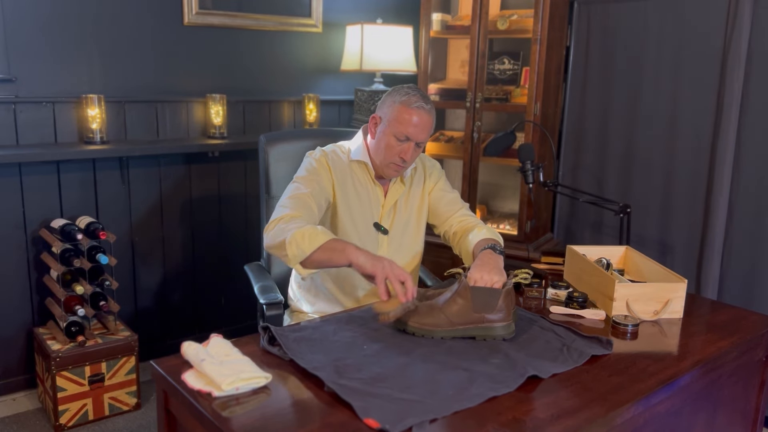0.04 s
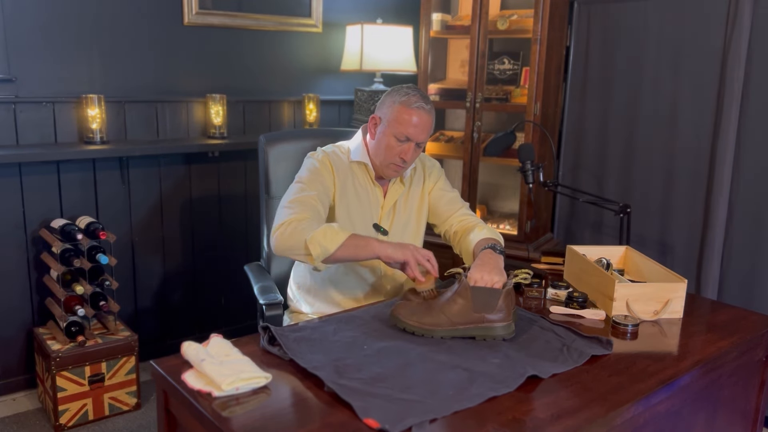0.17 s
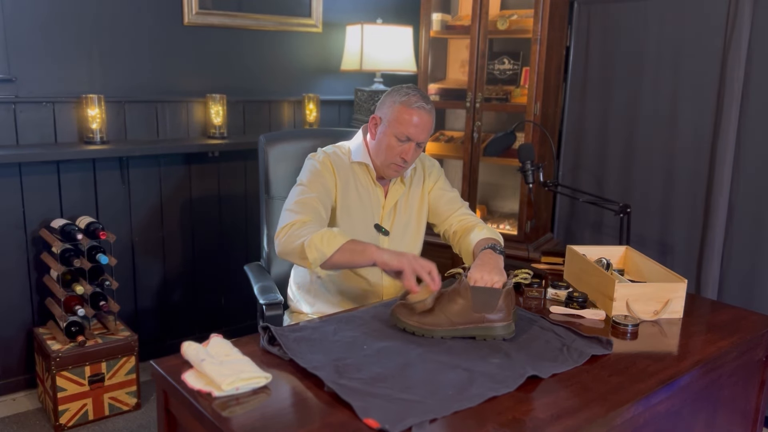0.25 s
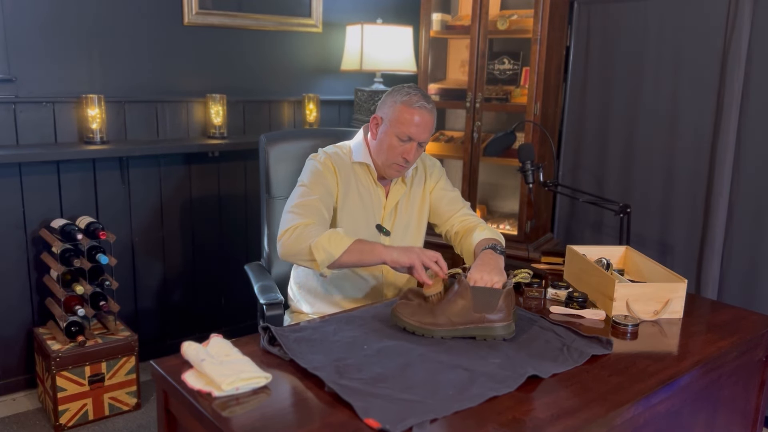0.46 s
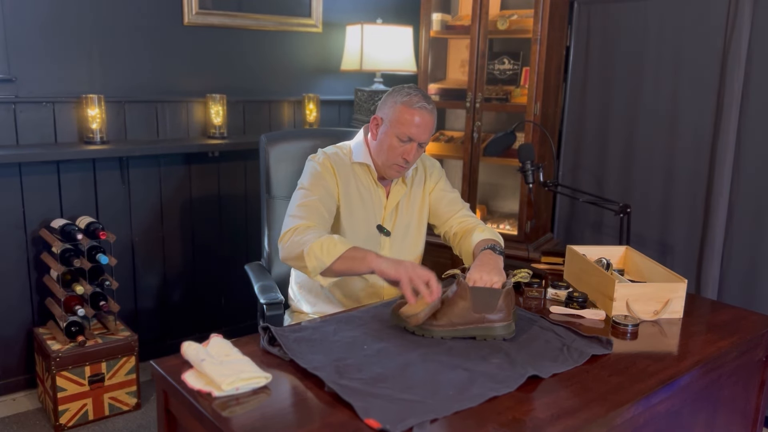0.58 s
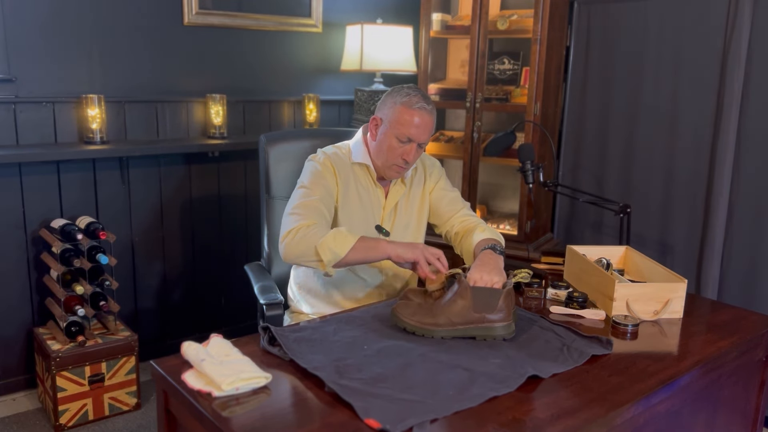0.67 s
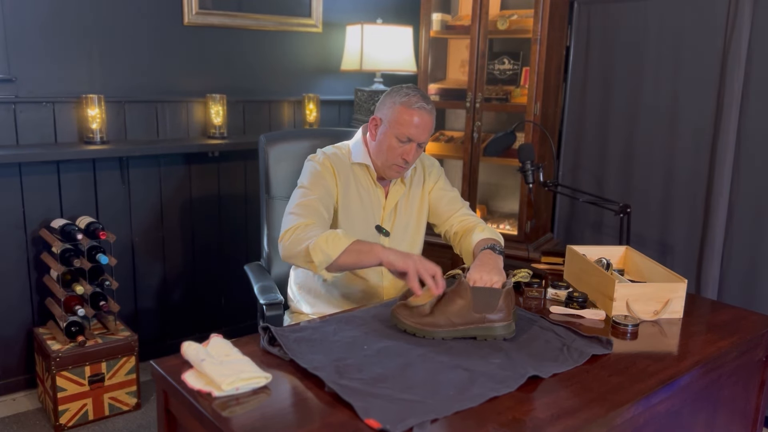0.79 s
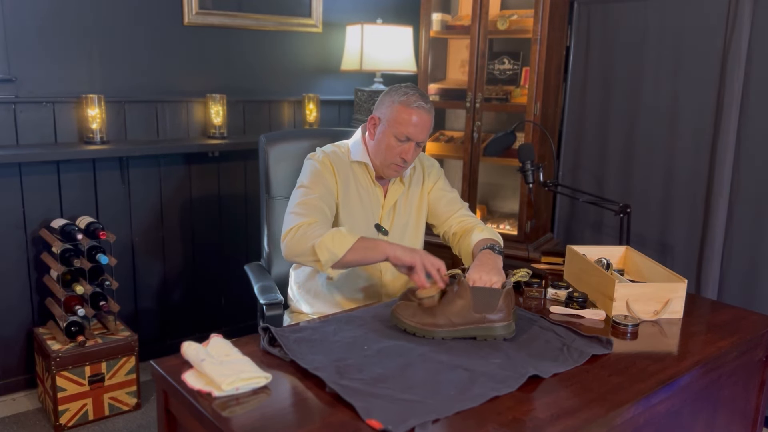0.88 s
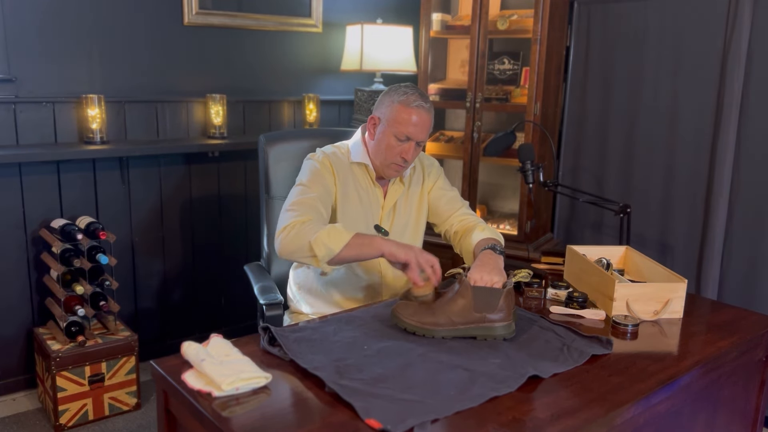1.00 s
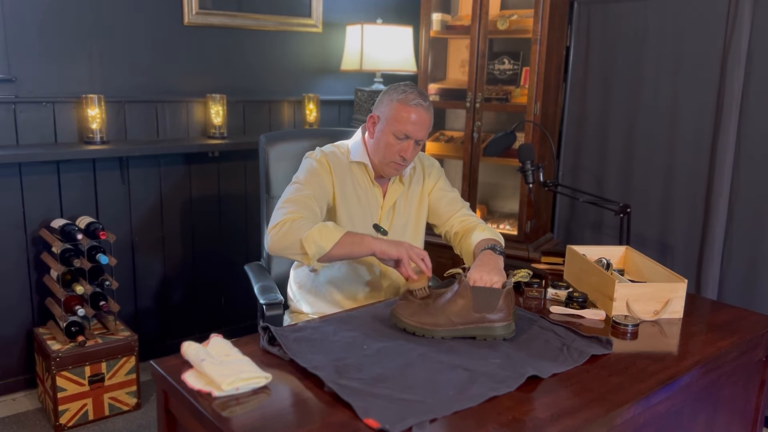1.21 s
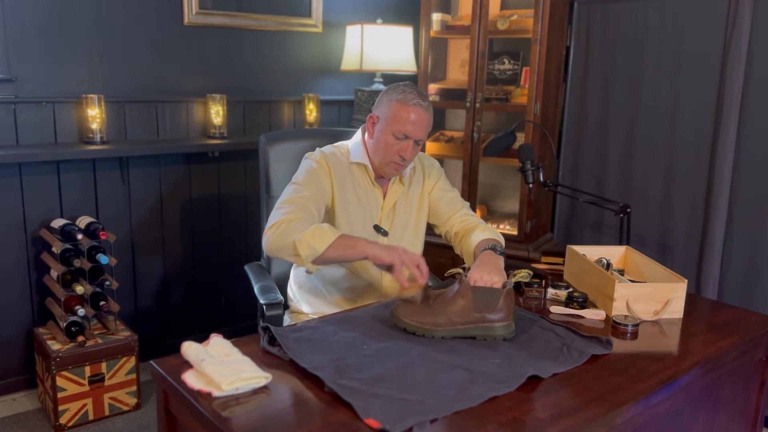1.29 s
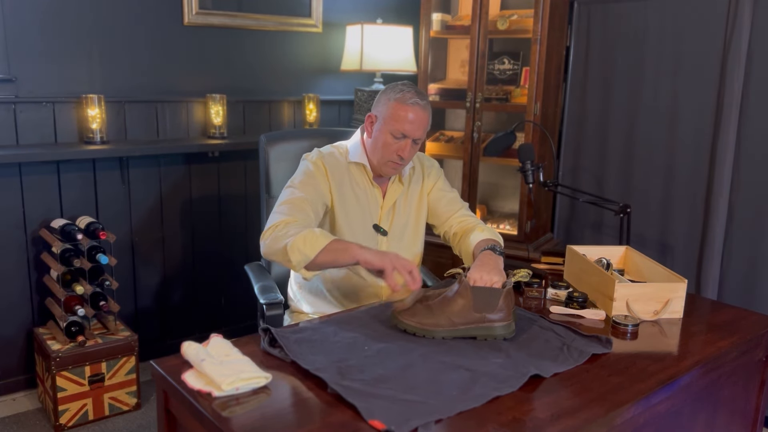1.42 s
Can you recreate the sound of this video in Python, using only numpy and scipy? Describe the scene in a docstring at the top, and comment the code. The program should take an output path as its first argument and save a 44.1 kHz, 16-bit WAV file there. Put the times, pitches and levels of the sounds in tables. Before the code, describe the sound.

Brisk, close brushing on a leather boot, bristles rasping over the hollow toe.

```python
"""A hand brush scrubs a leather boot, back and forth about eight times a second, close to the microphone.
At each turn the bristles bite and judder on the hollow boot; then they slide, hiss and flick free.
Tufts snag now and then, the boot bumps once on the covered table, and the arm's motion rumbles faintly.
Farther off, a quiet furnished room gives a short, soft answer."""
import sys
import numpy as np
from scipy import signal
from scipy.fft import rfft, irfft, next_fast_len
from scipy.io import wavfile
from scipy.ndimage import uniform_filter1d

SR = 44100
rng = np.random.default_rng(int(sys.argv[2]) if len(sys.argv) > 2 else 0)


def file_out(sig):
    """Save sig as 16-bit WAV at sys.argv[1]."""
    # one column per channel
    cols = np.atleast_2d(sig).T
    # limit, then scale
    lim = np.clip(cols, -1, 1)
    pcm = np.round(lim * 32767).astype(np.int16)
    wavfile.write(sys.argv[1], SR, pcm)


N = 63945
SLIPS_PER_S, SCRAPES_PER_S = 640, 1300
RELEASE_DB_PER_S = 531


# The scrubbing, close up. Each row: start, length and grip time in seconds, pitch of the spot struck
# in Hz, then levels in dB of thud, judder, scrape, brush ring, hiss, sizzle and flick.
SCRUBS = [ (0.093, 0.093, 0.047, 315, -65, -78, -79, -87, -93, -98, -79),
          (0.214, 0.093, 0.018, 327, -55.5, -62, -55, -65.5, -88, -71, -79),
          (0.248, 0.095, 0.0084, 432, -47, -48, -54.5, -63, -62, -74, -86),
          (0.369, 0.069, 0.013, 273, -44, -46.5, -47, -54.5, -57, -64, -75),
          (0.489, 0.074, 0.011, 400, -50, -47, -46, -60, -70, -62, -77),
          (0.606, 0.088, 0.025, 328, -42.5, -43, -47, -56, -58, -60, -60),
          (0.75, 0.17, 0.035, 399, -43, -48.5, -46, -60, -65.5, -58, -75),
          (0.862, .100, 0.028, 364, -52.5, -43, -46, -55.5, -55.5, -64, -53),
          (1.003, 0.098, 0.025, 285, -42, -49, -51.5, -57, -63, -64, -74),
          (1.142, 0.086, 0.028, 265, -50, -54, -66.5, -63.5, -69, -78, -62.5),
          (1.256, 0.15, 0.021, 409, -62.5, -69, -74, -82, -79.5, -75, -83.5),
          (1.4, 0.07, 0.061, 348, -65, -73, -80.5, -82.5, -86, -85, -103)]
# The hollow boot's resonances. Each row: centre in Hz, width in Hz, gain in dB.
BOOT_MODES = [(215, 40.6, -3), (287, 27.4, 1), (315.1, 22.5, 1), (373.4, 50.5, 1.5), (478, 41.7, -1.5),
              (496.8, 17.4, 3), (587.7, 77.4, 0.5), (847, 49, -5.5), (894, 33.7, -2), (986, 40, -1.5),
              (1011, 47, -2), (1191, 90, -1.5), (1309, 49, -3), (1490, 218, -9.5)]
# Colours of the biting and dragging forces. Each row: frequency in Hz, relative level in dB.
JUDDER_COLOUR = [(100, -15), (240, -26), (380, 7), (560, 4), (700, -9), (1000, -2), (1800, -12),
                 (4000, -50)]
DRAG_COLOUR = [(100, -50), (300, -3), (600, -4), (900, 1), (1400, -3.5), (1900, 5), (2400, -7.5), (4000, 8),
               (8000, -60)]
def boot():
    """The bite at each turn thuds and judders on the boot; the drag scrapes its higher resonances."""
    start, length, grip_s, _, _, judder_db, scrape_db = np.transpose(SCRUBS)[:7]
    bite = sum(gripping(*row) for row in zip(start, length, grip_s, judder_db))
    drag = stroking(scrape_db, rise_s=0.038, hold_s=0.0083, lead_s=0.012,
                    sag_db_per_s=125, release_db_per_s=426)
    thud = resonate(thuds(), BOOT_MODES)
    judder = coloured(slips(SLIPS_PER_S, spread_db=1.5, smooth=0.067), JUDDER_COLOUR)
    scrape = coloured(slips(SCRAPES_PER_S, spread_db=0.5, smooth=0.63), DRAG_COLOUR)
    return thud + driven(judder, bite, BOOT_MODES) + driven(scrape, drag, BOOT_MODES)


def thuds(spread_octaves=0.3):
    """Each landing pushes on the boot in a band around the pitch of the spot it meets."""
    out = np.zeros(N)
    for start, length, grip_s, spot_hz, db, *_ in SCRUBS:
        spot = lambda f: np.exp(-(np.log2((f + 1) / spot_hz) / spread_octaves) ** 2 / 2)
        force = unit(filtered(slips(SLIPS_PER_S, spread_db=1.5, smooth=0.39), spot))
        out += gripping(start, length, grip_s, db) * force
    return out


def gripping(start, length, grip_s, db, bite_s=0.004, fall_db_per_s=432):
    """The bristles touch, bite, grip, then slide on with a weak tremble until the stroke ends."""
    t = clock() - start
    touch = amp(-10.5 + 445 * np.minimum(t, 0))  # the first tips arrive just before the bite
    onset = np.maximum(touch, np.clip(t / bite_s, 0, 1))
    slid_db = np.clip(fall_db_per_s * (t - grip_s), 0, 15.5)
    return onset * amp(db - slid_db - RELEASE_DB_PER_S * np.maximum(t - length, 0))


def stroking(levels, rise_s, hold_s, lead_s, sag_db_per_s, release_db_per_s):
    """Every stroke swells, sags after its hold time and is released at its end."""
    power = np.zeros(N)
    for (start, length, *_), db in zip(SCRUBS, levels):
        t = clock() - start
        rise = np.clip((t + lead_s) / (rise_s + lead_s), 0, 1)
        sag_db = sag_db_per_s * np.maximum(t - hold_s, 0)
        release_db = release_db_per_s * np.maximum(t - length, 0)
        power += (rise * amp(db - sag_db - release_db)) ** 2
    return np.sqrt(power)


# Resonances of the brush block and its bristles. Each row: centre in Hz, width in Hz, gain in dB.
BLOCK_MODES = [(3136, 164, 8), (3450, 138, 16), (3630, 120, -3)]
BRISTLE_MODES = [(7900, 700, -2), (9000, 800, 0)]
# Bristles on leather, heard close. Each row: frequency in Hz, relative level in dB.
HISS_COLOUR = [(600, -19), (1900, 0), (2200, -8.5), (2450, 1.5), (2850, -8.5), (3400, -9.5), (4200, 0.5),
               (5100, -6.5), (6500, -4.5), (7200, -1.5), (9500, -7), (10500, -11.5), (11700, -17),
               (13500, -6.5), (15500, -25)]
def brush():
    """The slide rings the block, sizzles in the bristles and hisses on the leather; the tips flick off."""
    ring_db, hiss_db, sizzle_db, flick_db = np.transpose(SCRUBS)[7:]
    press = stroking(ring_db, rise_s=0.043, hold_s=0.054, lead_s=0.0053,
                     sag_db_per_s=89, release_db_per_s=567)
    slide = stroking(hiss_db, rise_s=0.039, hold_s=0.12, lead_s=0.033,
                     sag_db_per_s=40, release_db_per_s=RELEASE_DB_PER_S)
    sweep = stroking(sizzle_db, rise_s=0.063, hold_s=0.045, lead_s=0.00072,
                     sag_db_per_s=67, release_db_per_s=536)
    ring = driven(slips(SCRAPES_PER_S, spread_db=-1, smooth=0.49), press, BLOCK_MODES)
    sizzle = driven(swish(), sweep, BRISTLE_MODES)
    hiss = slide * coloured(swish(), HISS_COLOUR)
    return ring + sizzle + hiss + flicks(flick_db)


def swish(patchy_db=1.9):
    """Thousands of bristle tips blur into a fine grain whose colour shifts as the tufts bend."""
    grain = slips(per_s=9000, spread_db=2.5, smooth=0.8)
    spectra = signal.stft(grain, nperseg=256)[2]
    patches = uniform_filter1d(rng.standard_normal(spectra.shape), size=7, axis=0)  # across frequency
    patches = uniform_filter1d(patches, size=14, axis=1)  # across time
    return unit(signal.istft(spectra * amp(patchy_db * unit(patches)), nperseg=256)[1][:N])


# The tips leaving the leather. Each row: frequency in Hz, relative level in dB.
FLICK_COLOUR = [(1000, -31), (2500, 8.5), (5000, -15), (7800, 5.5), (9500, 0), (11500, -0.5), (13300, 0),
                (14700, 0), (15600, -11.5)]
def flicks(levels, rise_db_per_s=260, fall_db_per_s=454):
    """The bent bristles spring free in a bright burst that peaks near the end of a stroke."""
    envelope = np.zeros(N)
    for (start, length, *_), db in zip(SCRUBS, levels):
        t = clock() - start - 0.83 * length
        envelope += amp(db - np.maximum(-rise_db_per_s * t, fall_db_per_s * t))
    return envelope * coloured(swish(), FLICK_COLOUR)


# Bristles at the boot's seam. Each row: frequency in Hz, relative level in dB.
SEAM_COLOUR = [(1500, 0), (2600, 1), (4000, 12), (5200, -2), (6700, 9.5), (7800, 2), (15000, -22)]
def seam(centre_s=0.864, width_s=0.027, db=-51):
    """One brief, bright swish swells and fades as the brush crosses a seam."""
    swell = np.exp(-((clock() - centre_s) / width_s) ** 2 / 2)
    return amp(db) * swell * coloured(swish(), SEAM_COLOUR)


# Tufts that catch, close to the microphone. Each row: start in seconds, peak level in dB.
TUFT_SNAGS = [(0.147, -69), (.226, -52.5), (.264, -42), (0.372, -32.5), (0.385, -31), (0.492, -48.5),
              (0.614, -36), (0.64, -36), (0.748, -36.5), (0.791, -43), (0.876, -34), (.922, -39),
              (1.012, -43), (1.034, -39.5), (1.08, -39), (1.097, -46), (1.156, -45.5), (1.179, -44)]
def snags(block_db=-10, contact_s=0.00037):
    """A tuft lets go with a soft push that knocks boot and brush together."""
    u = clock() / contact_s
    push = u * (1 - u / 2) * np.exp(-u)
    knock = resonate(push, BOOT_MODES) + amp(block_db) * resonate(push, BLOCK_MODES)
    blows = np.zeros(N)
    for start, db in TUFT_SNAGS:
        blows[round(start * SR)] = amp(db)
    return signal.fftconvolve(blows, knock / np.abs(knock).max())[:N]


# The sole on the covered table, just under the brush. Each row: start in seconds, level in dB.
SOLE_BUMPS = [(.323, -46), (.336, -37.5), (0.345, -46), (0.353, -39)]
def bump(hz=129.6, t60_s=0.0404):
    """The boot rocks once, its quick contacts merging into a dull bump."""
    out = np.zeros(N)
    for start, db in SOLE_BUMPS:
        t = np.maximum(clock() - start, 0)
        out += amp(db - 60 * t / t60_s) * np.sin(2 * np.pi * hz * t)
    return out


# The arm working near the microphone. Each row: time in seconds, relative level in dB.
ARM_LEVELS = [(0.0, -68), (0.184, -78), (0.354, -49.5), (0.424, -61), (0.702, -59.5), (0.798, -50.5),
              (0.822, -50.5), (0.888, -50), (0.972, -57), (1.162, -60.5), (1.4, -70), (1.45, -66.5)]
# Its rumble. Each row: frequency in Hz, relative level in dB.
ARM_COLOUR = [(10, 2.5), (25, 3.5), (40, -6), (55, -7), (90, -9.5), (150, -18), (250, -16.5), (600, -41.5)]
def arm(gain_db=-1):
    """The moving arm makes a faint rumble that rises and falls."""
    level_db = gain_db + np.interp(clock(), *np.transpose(ARM_LEVELS))
    return amp(level_db) * coloured(rng.standard_normal(N), ARM_COLOUR)


def room(x, table_db=-8.5, table_t60_s=0.013, room_db=-19, room_t60_s=0.23):
    """Quick echoes off the table top reach the microphone with the soft tail of a furnished room."""
    t = clock()
    table = rng.standard_normal(N) * (t > 0.001) * amp(-60 * t / table_t60_s)
    tail = coloured(rng.standard_normal(N), [(200, 3.5), (3000, 7), (14000, -29)])
    tail *= amp(-60 * t / room_t60_s)
    answer = amp(table_db) * table / np.linalg.norm(table) + amp(room_db) * tail / np.linalg.norm(tail)
    return signal.fftconvolve(x, answer)[:N]


# The still room all around. Each row: frequency in Hz, relative level in dB.
ROOM_TONE_COLOUR = [(20, 3.5), (100, -17), (330, -15.5), (700, -13.5), (2000, -26), (8000, -31),
                    (15000, -43)]
def room_tone(db=-77.5):
    """A steady, dark hush lies far behind the brushing."""
    return amp(db) * coloured(rng.standard_normal(N), ROOM_TONE_COLOUR)


def slips(per_s, spread_db, smooth):
    """Irregular tiny slips of uneven size on a bed of smooth friction."""
    ticks = (rng.random(N) < per_s / SR) * rng.choice([-1, 1], N)
    sizes = amp(spread_db * np.clip(rng.standard_normal(N), -2, 2))
    return unit(unit(ticks * sizes) + smooth * rng.standard_normal(N))


def driven(force, envelope, modes):
    """Resonances rung by a force that follows an envelope."""
    return resonate(force * envelope, modes) / np.std(resonate(force, modes))


def resonate(x, modes):
    """x through a set of resonances of alternating sign."""
    def response(f):
        return sum((-1) ** k * amp(db) * 1j * f * width / (hz * hz - f * f + 1j * f * width)
                   for k, (hz, width, db) in enumerate(modes))
    return filtered(x, response)


def coloured(x, points):
    """x shaped by a curve through (Hz, dB) points, at rms 1."""
    hz, db = np.transpose(points)
    return unit(filtered(x, lambda f: amp(np.interp(np.log(f + 1), np.log(hz + 1), db))))


def filtered(x, response):
    """x through a frequency response."""
    size = next_fast_len(N + SR // 2)
    return irfft(rfft(x, size) * response(np.fft.rfftfreq(size, 1 / SR)), size)[:N]


def amp(db):
    """Decibels to gain."""
    return 10 ** (np.asarray(db) / 20)


def unit(x):
    """x scaled to rms 1."""
    return x / np.sqrt(np.mean(x ** 2) + 1e-20)


def clock():
    """The time of every sample in seconds."""
    return np.arange(N) / SR


def scene():
    """Brush and boot up close, the still room behind them."""
    near = boot() + brush() + seam() + snags() + arm() + bump()
    return (near + room(near) + room_tone())[None]


def record(dry, top_hz=15600):
    """One microphone, with nothing kept above the band limit."""
    return filtered(dry[0], lambda hz: hz < top_hz)[None]


dry = scene()
out = record(dry)
file_out(out)
```